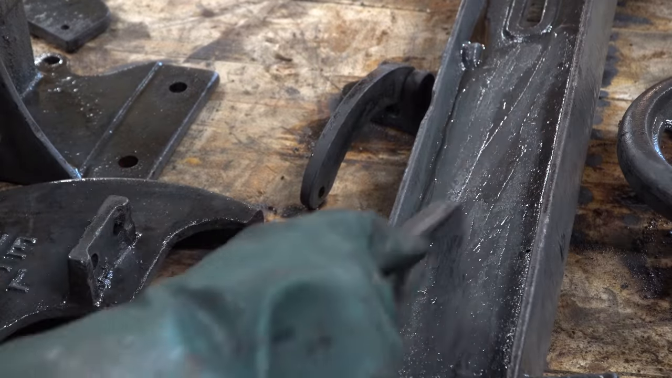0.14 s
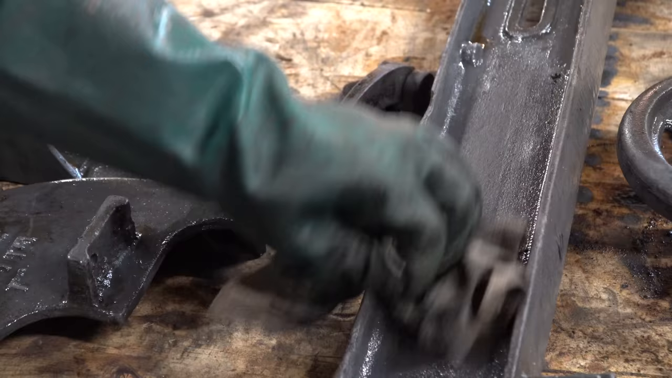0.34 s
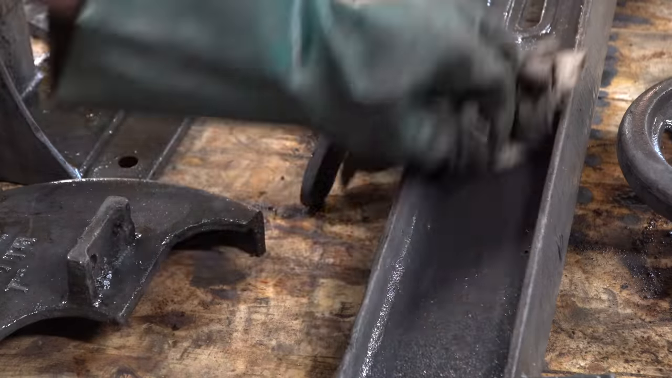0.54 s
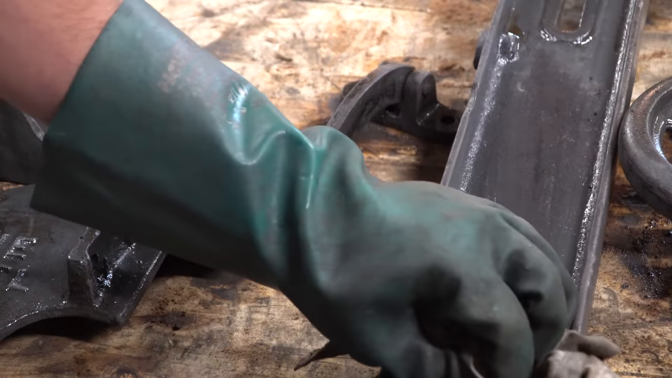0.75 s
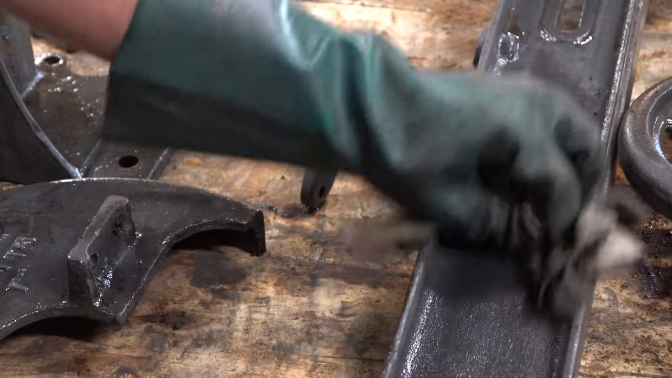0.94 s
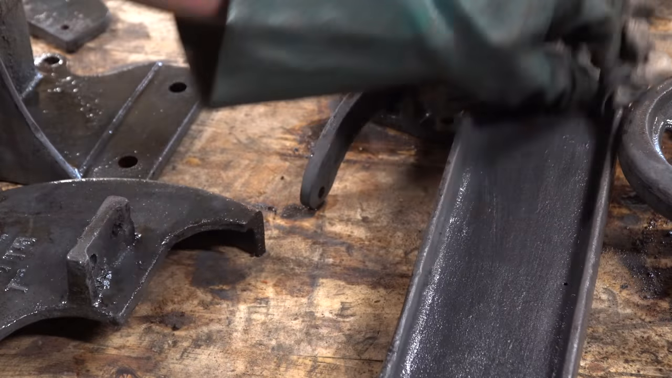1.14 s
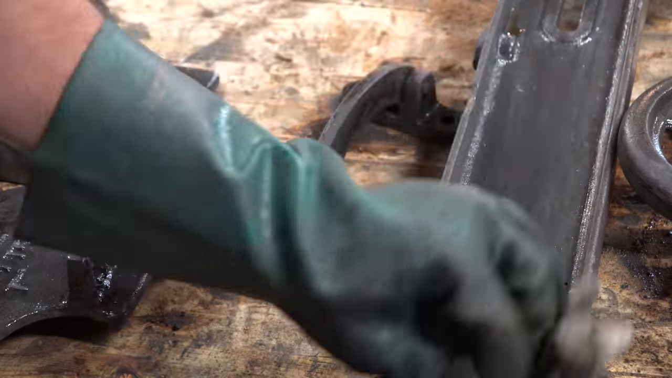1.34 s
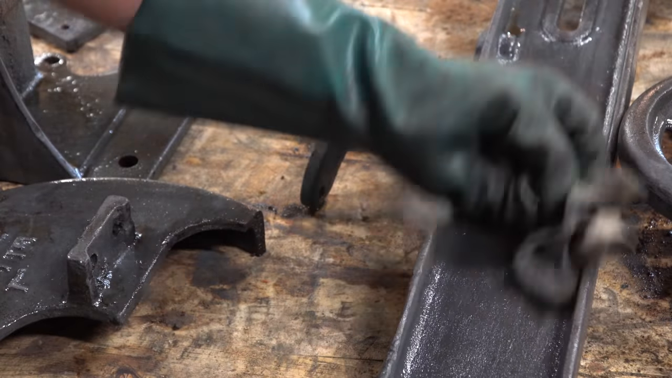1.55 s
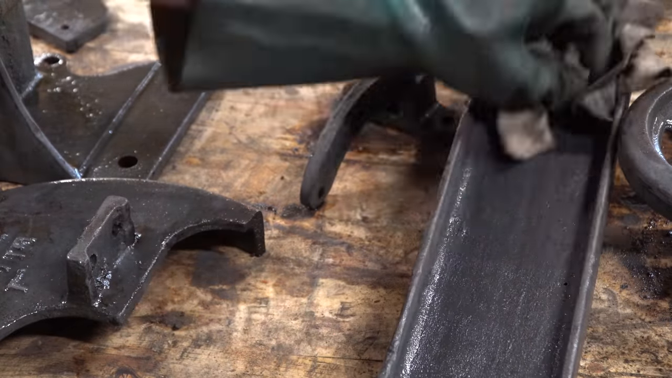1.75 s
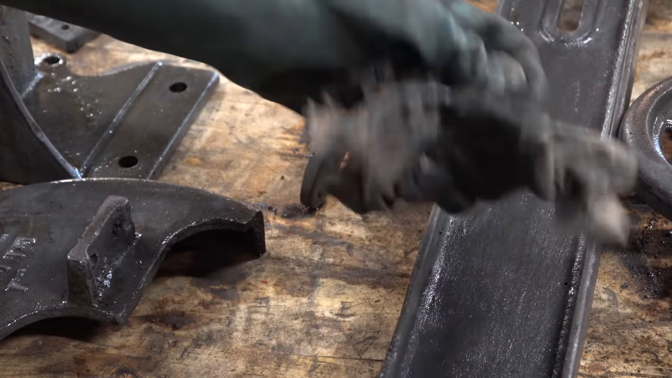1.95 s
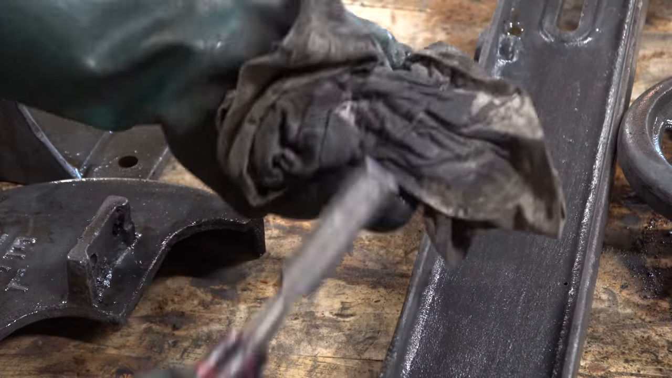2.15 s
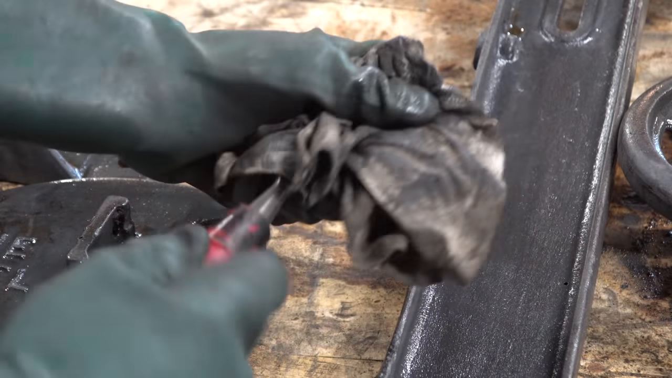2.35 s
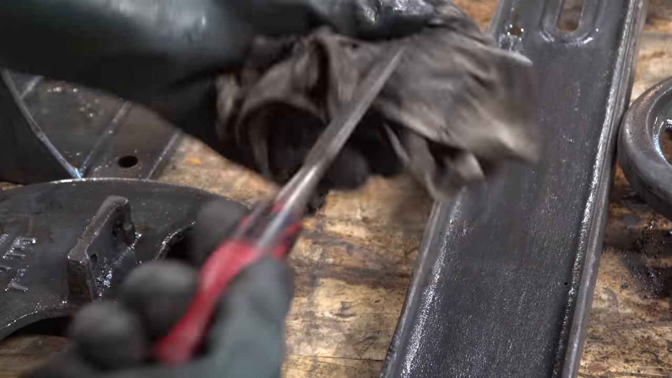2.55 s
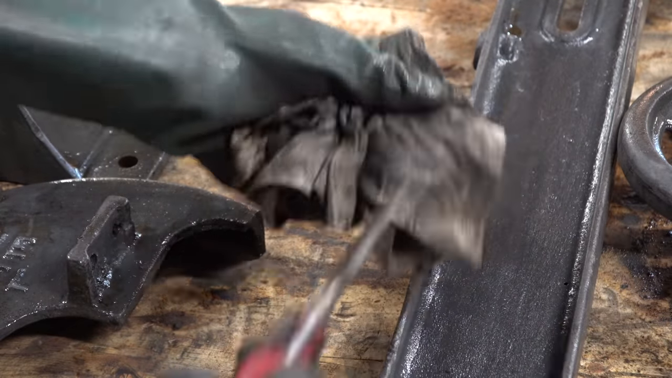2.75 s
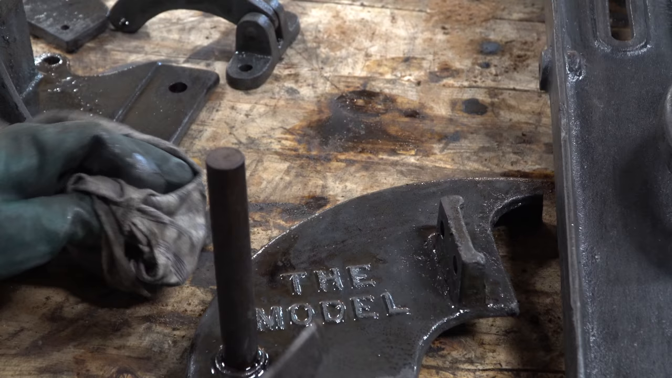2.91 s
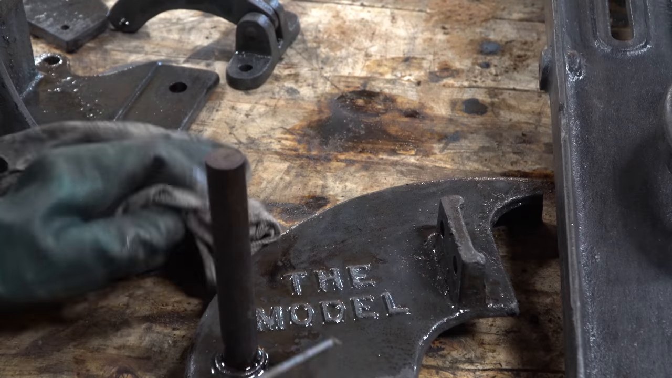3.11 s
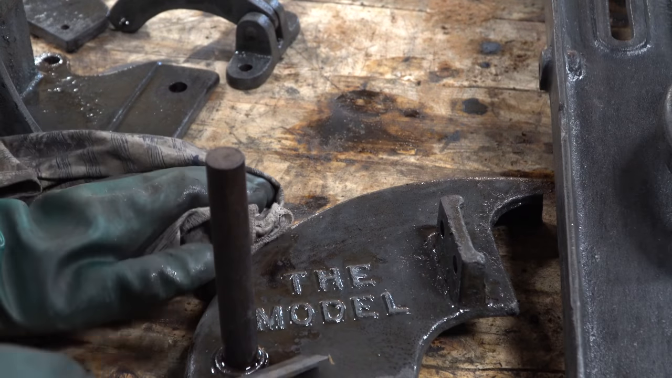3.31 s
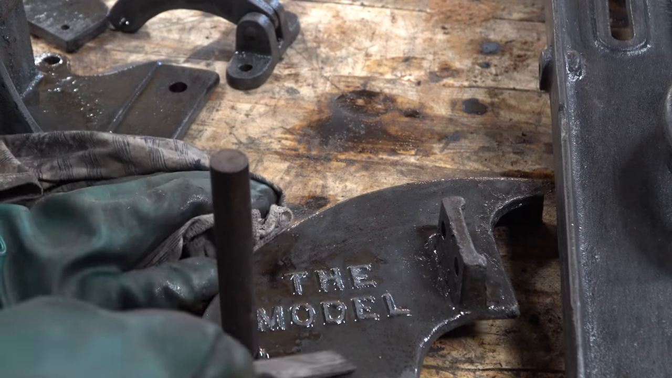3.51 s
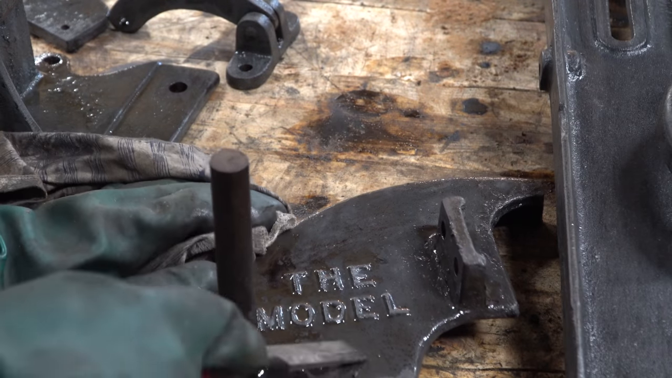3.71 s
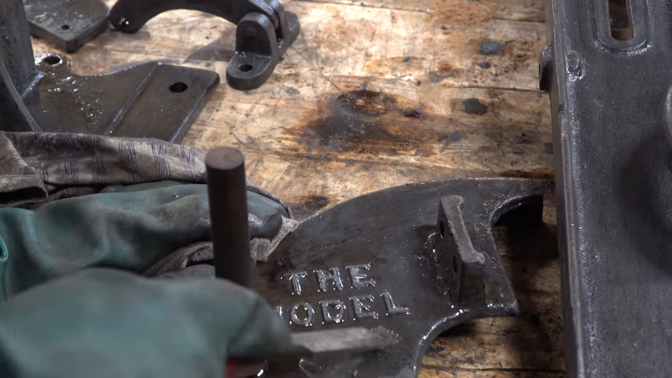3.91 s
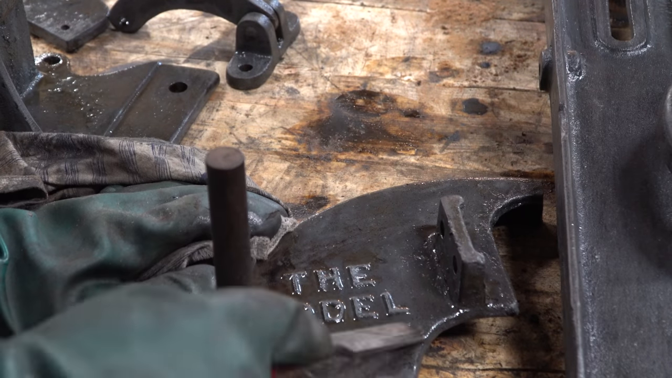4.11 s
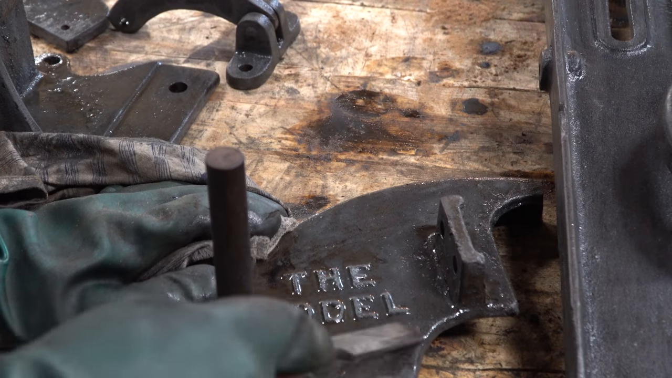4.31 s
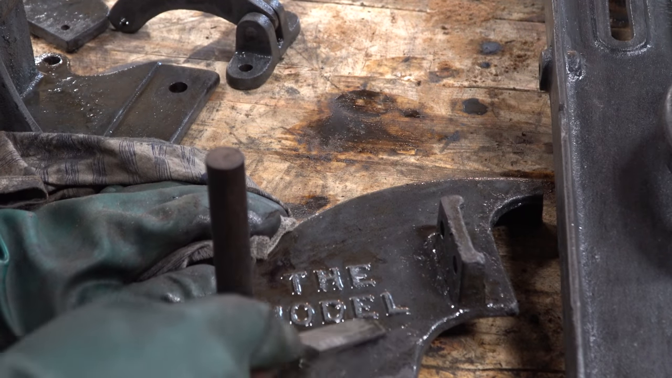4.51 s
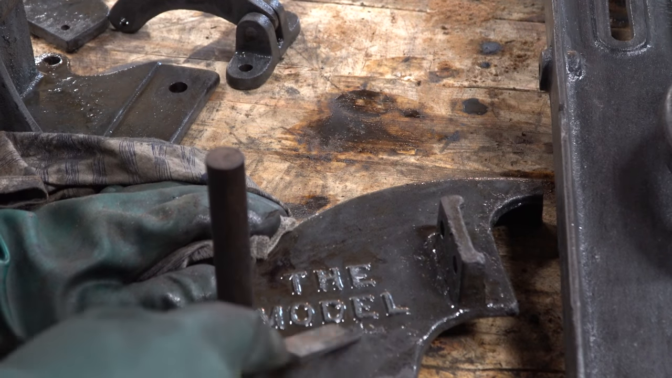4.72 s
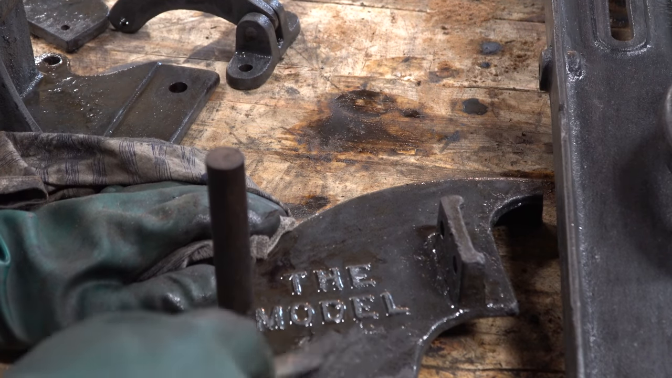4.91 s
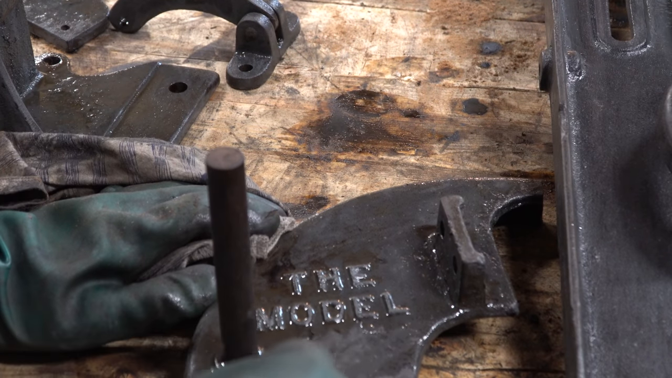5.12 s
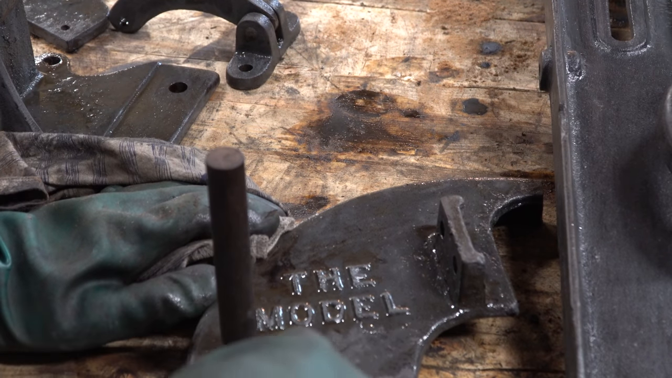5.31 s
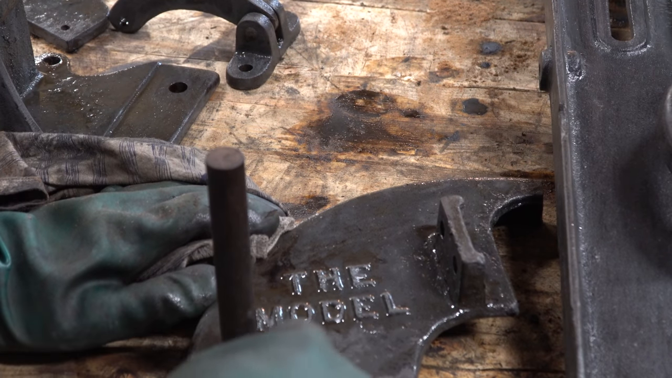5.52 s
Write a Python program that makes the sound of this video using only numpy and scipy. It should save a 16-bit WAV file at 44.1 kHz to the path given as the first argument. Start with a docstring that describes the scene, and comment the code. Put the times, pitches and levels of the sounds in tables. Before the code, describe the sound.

Metal scrapes and a rag wiping iron, a dull knock on a wooden bench, then quick, short scraping strokes with a light ring.

```python
"""A steel scraper rasps on an iron channel, later in short, quick strokes on an iron base plate.
Its edge catches in tiny slips that ring the iron's modes. In between, a rag wipes the channel,
which knocks on the bench, rattles and clanks softly; the rag rustles as it turns in rubber gloves.
Behind it are the room tone and reverberation of a small workshop. The level dips briefly at times."""
import sys
import numpy as np
from scipy import signal
from scipy.io import wavfile
from scipy.ndimage import uniform_filter1d

SR = 44100
rng = np.random.default_rng(int(sys.argv[2]) if len(sys.argv) > 2 else 0)


def transcribe(u):
    """Save the signal u as a 16-bit wav file named by the first command-line argument.

    u: samples, shape (n,) or (channels, n), limited to [-1, 1]; the rate is SR.
    q: integer samples, one column per channel.
    """
    v = np.clip(np.atleast_2d(u).T, -1, 1)
    q = np.round(v * 32767).astype(np.int16)
    wavfile.write(sys.argv[1], SR, q)


N = 245195
TIME = np.arange(N) / SR


def gain_of(db):
    return 10 ** (np.asarray(db) / 20)


def unit_rms(x):
    return x / np.sqrt(np.mean(x ** 2) + 1e-30)


def colour(x, spectrum):
    """Minimum-phase filter; unit white noise leaves with unit power in 1.4-9 kHz."""
    hz = abs(np.fft.fftfreq(4096, 1 / SR))
    points_hz, db = np.transpose(spectrum)
    log_gain = np.log(gain_of(np.interp(np.log(hz + 1), np.log(points_hz + 1), db)))
    band = (hz > 1400) & (hz < 9000)
    log_gain -= np.log(np.sum(np.exp(2 * log_gain[band])) / len(hz)) / 2
    taps = np.fft.ifft(np.exp(np.conj(signal.hilbert(log_gain)))).real[:2048]
    return signal.oaconvolve(x, taps)[:len(x)]


def ring(x, hz, width_hz):
    """One mode: two-pole resonance, peak gain 1, skirts trimmed."""
    radius, angle = np.exp(-np.pi * width_hz / SR), 2 * np.pi * hz / SR
    near = signal.lfilter(*signal.iirpeak(hz, 1.5, fs=SR), x + 1e-15)
    feedback = [1, -2 * radius * np.cos(angle), radius ** 2]
    return signal.lfilter([2 * (1 - radius) * np.sin(angle)], feedback, near)


def wander(span_s):
    """Smooth random drift, rms 1."""
    coarse = rng.standard_normal(N // 64 + 2)
    size = max(round(span_s * SR / 64), 1)
    smooth = uniform_filter1d(uniform_filter1d(coarse, size), size)
    return np.interp(np.arange(N) / 64, np.arange(len(coarse)), unit_rms(smooth))


def mottle(x, width_hz, span_s, depth_db=3):
    """The spectrum drifts in patches as the contact shifts."""
    spectra = signal.stft(x, nperseg=512)[2]
    patches = rng.standard_normal(spectra.shape)
    for _ in range(2):
        patches = uniform_filter1d(patches, round(width_hz * 512 / SR), axis=0)
        patches = uniform_filter1d(patches, round(span_s * SR / 256), axis=1)
    return signal.istft(spectra * gain_of(depth_db * unit_rms(patches)), nperseg=512)[1][:N]


def friction(slips_per_s, spread_db, flutter_db):
    """Dense tiny slips of uneven size, in clumps."""
    slips = (rng.random(N) < slips_per_s / SR) * rng.standard_normal(N)
    size_db = spread_db * np.minimum(rng.exponential(1, N), 5)
    return unit_rms(slips * gain_of(size_db + flutter_db * wander(.004)))


def press(slips, gestures, treble_hz, dull_db=5.5):
    """Pressure swells, holds and lets go; duller while the motion is slow."""
    power = np.full((2, N), 1e-20)
    for start, end, db, swell_db, rise, fall, treble_db in gestures:
        span = slice(max(round((start - 4 * rise) * SR), 0), round((end + 4 * fall) * SR))
        t = TIME[span]
        away = np.maximum(start - t, 0) / rise + np.maximum(t - end, 0) / fall
        level_db = np.interp(t, [start, end + 1e-6], [db, db + swell_db]) - 6 * away ** 2
        power[:, span] += gain_of([level_db, level_db + treble_db - dull_db * away]) ** 2
    low = signal.lfilter(*signal.butter(1, treble_hz, fs=SR), slips)
    return low * np.sqrt(power[0]) + (slips - low) * np.sqrt(power[1])


# air spectrum: f/Hz, density/dB
AIR_SPECTRUM = [(24, -50), (40, -22.5), (123, 2), (197, -2.5), (562, 5), (3300, -8), (15500, -27)]

def room_tone():
    """Faint, steady, dark noise."""
    return gain_of(-85.5) * unit_rms(colour(rng.standard_normal(N), AIR_SPECTRUM))


# workshop decay: f/Hz, t60/s
ROOM_DECAY = [(100, 0.41), (1000, 0.29), (4000, 0.22), (12000, 0.16)]

def reverb(x):
    """Sparse echoes of random sign; each band decays at its own rate."""
    echoes = np.zeros(SR // 2)
    slots = np.arange(200, len(echoes) - 20, 20)
    echoes[slots + rng.integers(0, 20, len(slots))] = rng.choice([-1., 1.], len(slots))
    hz, t, spectra = signal.stft(echoes, SR, nperseg=256)
    points_hz, points_t60 = np.transpose(ROOM_DECAY)
    t60 = np.interp(np.log(hz + 1), np.log(points_hz), points_t60)
    tail = signal.istft(spectra * gain_of(-60 * t / t60[:, None]), SR, nperseg=256)[1]
    return signal.oaconvolve(x, tail / np.linalg.norm(tail))[:N]


# cloth spectrum: f/Hz, density/dB
CLOTH_SPECTRUM = [(35, -52), (60, -21.5), (159, -2.5), (187, -6.5), (403, -6), (1740, -12), (2360, -7),
                  (3120, -16.5), (3930, -13.5), (12000, -24), (15500, -19)]
# rustle envelope: t/s, level/dB
RUSTLE_ENVELOPE = [(1.93, -69), (2.046, -71.5), (2.304, -72.5), (2.474, -80.5), (2.772, -80.5), (2.96, -78)]
# glove swishes: t/s, length/s, level/dB, upper whistle f/Hz, lower whistle gain/dB
GLOVE_SWISHES = [(2.019, 0.078, -75, 3850, 2), (2.277, 0.041, -84, 3900, 6),
                 (2.357, 0.024, -81.5, 3940, -9), (2.477, 0.015, -68.5, 4500, 4),
                 (2.63, 0.021, -84, 3830, 14), (2.699, 0.037, -75, 4640, 18.5),
                 (2.841, 0.033, -91.5, 4900, 41), (2.893, 0.017, -77, 4200, 27.5)]

def rag_rustle():
    """Cloth slides as the rag turns; each glove swish adds a puff and two fuzzy whistles."""
    slips = friction(slips_per_s=36000, spread_db=.2, flutter_db=1.5)
    level_db = np.interp(TIME, *np.transpose(RUSTLE_ENVELOPE), left=-200, right=-200)
    folds = signal.lfilter(*signal.butter(1, 5030, fs=SR), slips) * gain_of(level_db)
    whistles = np.zeros(N)
    rise_s, fall_s, treble_db = .0073, .0059, 2
    for start, length, db, upper_hz, lower_db in GLOVE_SWISHES:
        puff = press(slips, [(start, start + length, db, 0, rise_s, fall_s, treble_db)], treble_hz=2630)
        folds += puff
        whistles += gain_of(13) * ring(puff, upper_hz, width_hz=480)
        whistles += gain_of(lower_db) * ring(puff, hz=2260, width_hz=180)
    return colour(folds, CLOTH_SPECTRUM) + whistles


# rag wipes, plus a rattle at 0.752 s: t/s, length/s, level/dB, swell/dB, rise/s, fall/s, treble/dB
WIPES_AND_RATTLE = [(0.447, 0.055, -44.5, -0.7, 0.049, 0.0097, 5),
                    (0.581, .093, -53, 6, 0.0077, 0.0077, 14), (.752, .134, -44.5, -2, 0.0056, .029, -32),
                    (0.917, 0.15, -51, 5.5, .018, 0.022, 9.5), (1.239, 0.19, -47, -12, 0.038, 0.015, 14),
                    (1.495, 0.18, -43, -1.5, 0.004, 0.016, 1.5),
                    (1.842, 0.043, -53, -2.4, 0.034, 0.035, 16.5)]
# wipe and rattle spectrum: f/Hz, density/dB
WIPE_RATTLE_SPECTRUM = [(60, -18.5), (300, -19), (560, -4), (1000, -9), (2000, -1.5), (4200, -10),
                        (7000, -20.5), (10000, -28.5), (15500, -32.5)]
# channel modes: f/Hz, width/Hz, gain/dB
CHANNEL_MODES = [(635, 30, -20), (1114, 20, 5), (1175, 40, -11), (1268, 28, -6), (1775, 26, -7),
                 (2265, 25, -11), (2420, 36, -10), (2730, 26, -18), (3010, 25, -20), (4080, 45, -21),
                 (4200, 35, -17), (5590, 80, -27)]

def wipes_and_rattle():
    """Rag wipes, plus a dull rattle of the channel after the knock; both stir its modes."""
    gestures = [(start, start + length, *shape) for start, length, *shape in WIPES_AND_RATTLE]
    force = press(friction(slips_per_s=26000, spread_db=.8, flutter_db=1.2), gestures, treble_hz=5000)
    noise = mottle(colour(force, WIPE_RATTLE_SPECTRUM), width_hz=1000, span_s=.05)
    hum = sum(gain_of(db) * ring(force, hz, width) for hz, width, db in CHANNEL_MODES)
    return noise + gain_of(-9.5) * hum


# blows: t/s, level/dB, contact/s
BENCH_BLOWS = [(0.745, -15.5, 0.0021), (0.7506, -5, 0.0051), (0.765, -13, 0.0029), (0.7901, -11.5, .00059),
               (.834, -25, 0.0005), (1.462, -32.5, 0.0018), (1.7026, -27, 0.0012), (3.658, -20, 0.0013),
               (3.785, -24, .0014)]
# bench modes: f/Hz, level/dB, t60/s
BENCH_MODES = [(107.4, -5, 0.18), (123.2, -4, 0.1), (198.2, -2.5, 0.12), (296, -3, 0.13), (525.5, 6, 0.026),
               (601, -3.5, 0.1), (723, 3, 0.034), (945, -7, 0.063), (1115, -5.5, 0.11)]

def bench_knocks():
    """Each blow pushes the bench modes and adds a dull click that grows faster than the force."""
    push, click = np.zeros((2, N + SR))
    click_db, click_growth, click_t60_s = -16.5, 2.32, .051
    snaps = rng.standard_normal((len(BENCH_BLOWS), 1500)) * gain_of(-60 * TIME[:1500] / click_t60_s)
    for (start, db, contact_s), snap in zip(BENCH_BLOWS, snaps):
        at = round(start * SR)
        pulse = np.hanning(round(contact_s * SR) + 2)
        rebound = signal.butter(2, .25 / contact_s, "high", fs=SR)  # brief blows move little bass
        blow = signal.lfilter(*rebound, np.pad(pulse / pulse.sum(), (0, len(snap))))
        push[at:at + len(blow)] += gain_of(db) * blow
        click[at:at + len(snap)] += gain_of(click_growth * db + click_db) * snap
    t = TIME[:SR // 2]
    bench = sum((-1) ** k * gain_of(db - 60 * t / t60) * np.sin(2 * np.pi * hz * t)
                for k, (hz, db, t60) in enumerate(BENCH_MODES))
    thuds = .5 * signal.oaconvolve(push, bench)[:N]
    return thuds + signal.lfilter(*signal.butter(2, 5500, fs=SR), click[:N])


def contact_force(contacts, touch_db_per_s, touch_share, rise_share):
    """Each contact touches brightly (the longer, the lighter), bites, then lifts."""
    touch_swell_db, touch_treble_db, touch_rise_s, lift_s = 2.5, 7, .003, .01
    gestures = []
    for start, length, db, swell_db, treble_db in contacts:
        bite = start + touch_share * length
        touch_db = db + touch_db_per_s * length
        gestures += [
            (start, bite, touch_db, touch_swell_db, touch_rise_s, lift_s, treble_db + touch_treble_db),
            (bite, start + length, db, swell_db, rise_share * length, lift_s, treble_db)]
    return press(friction(slips_per_s=8000, spread_db=1.5, flutter_db=2), gestures, treble_hz=2900)


def cast_iron(force, rasp_spectrum, modes, ring_db, spot_db):
    """Force on the cast skin: a rasp, plus modes whose share shifts with the spot touched."""
    body = sum(gain_of(db) * ring(force * gain_of(spot_db * wander(.035)), hz, width)
               for hz, width, db in modes)
    rasp = mottle(colour(force, rasp_spectrum), width_hz=500, span_s=.03)
    return rasp + gain_of(ring_db) * body


# scraper strokes, plus a clank at 1.46 s: t/s, length/s, level/dB, swell/dB, treble/dB
STROKES_AND_CLANK = [(-.03, 0.044, -35, -1, 0), (.052, 0.1, -38.5, 0, 2.5), (.205, 0.0878, -49.5, 2.5, 7),
                     (1.46, .016, -40, -9.5, -27.5)]
# edge rasp on the channel: f/Hz, density/dB
CHANNEL_SPECTRUM = [(40, -32), (400, -1), (900, -15.5), (2000, 2.5), (5000, -8), (9000, -23), (15500, -38)]

def strokes_and_clank():
    """Scraper strokes, plus one soft, dull clank, ring the channel's narrow modes."""
    force = contact_force(STROKES_AND_CLANK, touch_db_per_s=-110, touch_share=.45, rise_share=.3)
    return cast_iron(force, CHANNEL_SPECTRUM, CHANNEL_MODES, ring_db=33, spot_db=1.5)


# plate strokes: t/s, length/s, level/dB, swell/dB, treble/dB
PLATE_SCRAPES = [(3.205, 0.17, -69.5, -18.5, 17), (3.44, 0.032, -70, -4.5, 2),
                 (3.53, 0.066, -39.5, -9.5, -2.5), (3.618, 0.015, -67, -2, 4),
                 (3.645, 0.024, -46.5, -14, -28), (3.715, 0.048, -42, -5.5, -4),
                 (3.8, 0.03, -45, -1.5, 0.5), (3.865, 0.058, -36, -2, -1.5), (3.952, 0.0047, -58, 12, 2.5),
                 (4.063, 0.096, -34, -6, 2.5), (4.284, 0.076, -36, -5, 6.5), (4.485, 0.077, -39.5, -4, 7.5),
                 (4.688, 0.062, -38, -0.5, 5), (4.77, 0.023, -55.5, -1, 5), (4.866, 0.058, -43, 1.5, 5.5),
                 (4.962, 0.035, -45.5, -2, 11), (5.04, 0.031, -42, -1.5, -4.5),
                 (5.11, 0.028, -52.5, -10, -1), (5.168, 0.031, -39, -6, -7.5), (5.23, 0.019, -48.5, 7, -1),
                 (5.282, 0.026, -42.5, 5, -5), (5.345, 0.018, -51.5, 15, -1), (5.4, 0.03, -48.5, 8, 1),
                 (5.468, 0.027, -42.5, -6, -3), (5.528, 0.027, -41, 1, -5.5)]
# edge rasp on the plate: f/Hz, density/dB
PLATE_SPECTRUM = [(40, -37), (110, -11.5), (350, 7), (850, 2), (2800, 2.5), (5300, -12), (8000, -33.5),
                  (11000, -42), (15500, -58.5)]
# plate modes: f/Hz, width/Hz, gain/dB
PLATE_MODES = [(395, 50, -11), (505, 34, 6), (1000, 60, -9), (1262, 60, -3), (1560, 40, -12),
               (2110, 45, -7), (2285, 50, -2), (2815, 40, 0), (3200, 160, -11), (3650, 90, -13),
               (4085, 45, -6), (4210, 40, -9), (4715, 48, -3), (5050, 80, -13), (6470, 55, -19),
               (7080, 38, -10), (8650, 40, -29), (9760, 90, -28), (12500, 90, -38), (14000, 90, -35)]

def plate_scraping(heard_from_s=3.267):
    """Short, quick strokes ring the more damped base plate."""
    force = contact_force(PLATE_SCRAPES, touch_db_per_s=-300, touch_share=.6, rise_share=.18)
    return cast_iron(force, PLATE_SPECTRUM, PLATE_MODES, ring_db=22, spot_db=4) * (TIME > heard_from_s)


def scene():
    """All sources, reverberation and room tone; mono."""
    direct = strokes_and_clank() + plate_scraping() + wipes_and_rattle() + rag_rustle() + bench_knocks()
    return (room_tone() + direct + gain_of(-14) * reverb(direct))[None]


# level dips: t/s, silence/s, fade-in/s
LEVEL_DIPS = [(0.38, 0.0032, 0.038), (2.953, 0.02, .05), (3.267, 0.0068, 0.0024), (4.056, 0.0043, 0.0096),
              (4.28, 0.00081, 0.02), (4.482, 0.00084, 0.0045), (4.685, 0.00079, 0.0047),
              (4.862, 0.00054, .005)]

def record(dry):
    """Microphone bass loss, brief dips to silence, band limit."""
    bass_hz, top_hz, fade_out_s = 72, 15730, .0058
    fader = np.ones(N)
    for start, gap, fade_in in LEVEL_DIPS:
        fader *= np.interp(TIME, [start - fade_out_s, start, start + gap, start + gap + fade_in],
                           [1, 0, 0, 1])
    thin = signal.sosfilt(signal.butter(3, bass_hz, "high", fs=SR, output="sos"), dry)
    band_limit = signal.firwin(1023, top_hz, window=("kaiser", 9), fs=SR)
    return signal.oaconvolve(thin * fader, band_limit[None], "same")


dry = scene()
out = record(dry)
transcribe(out)
```